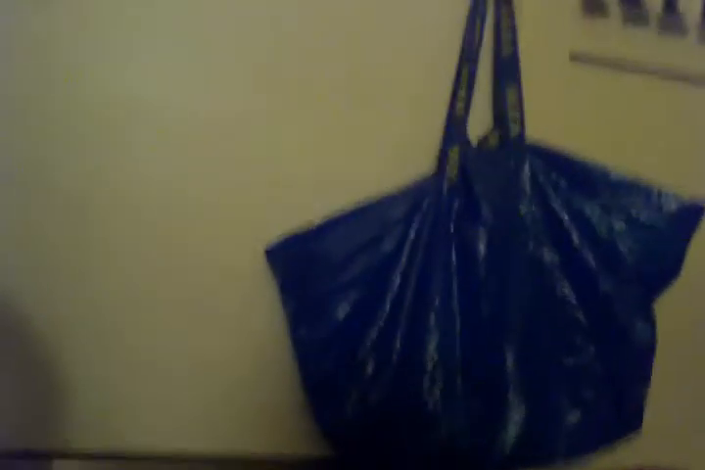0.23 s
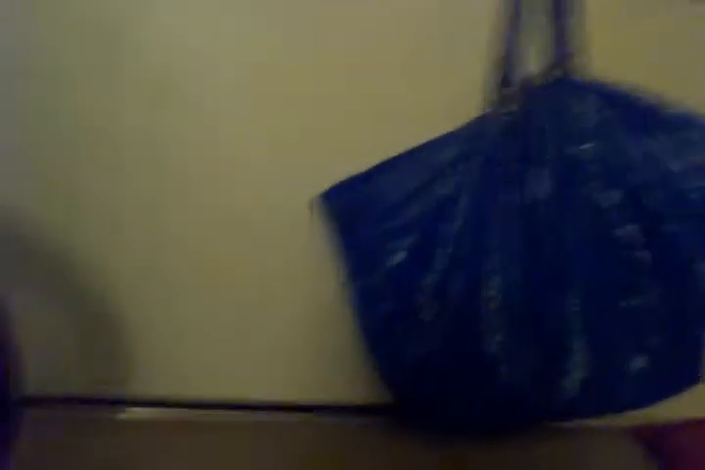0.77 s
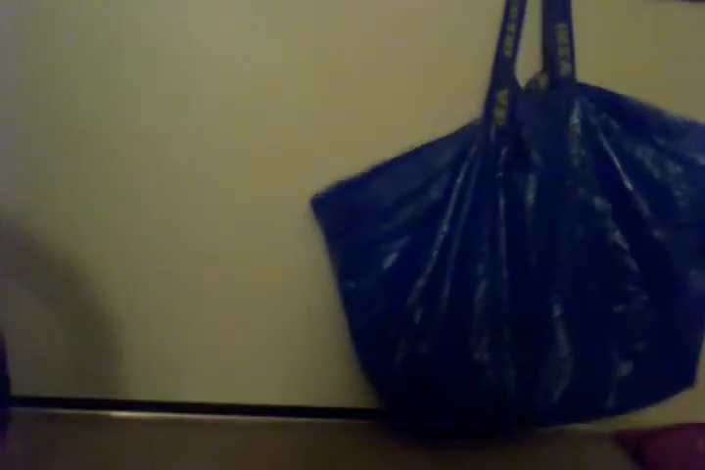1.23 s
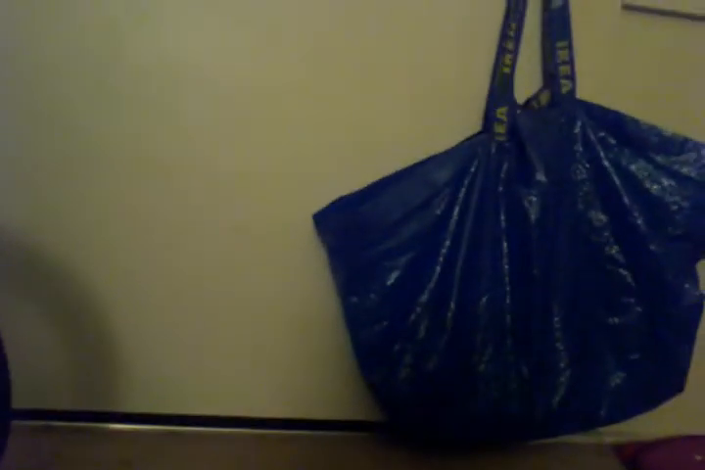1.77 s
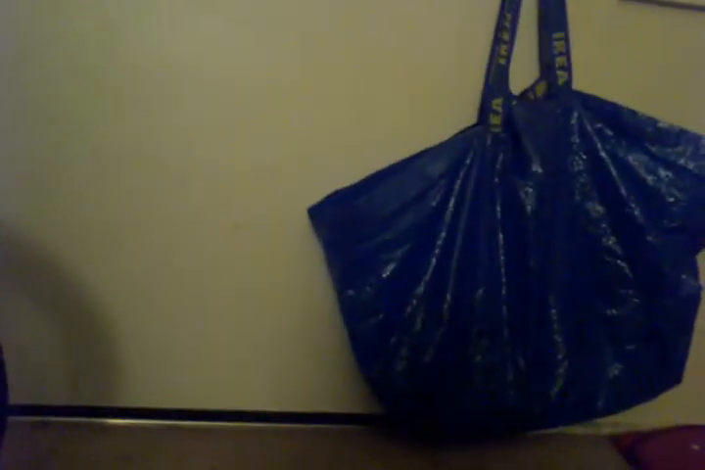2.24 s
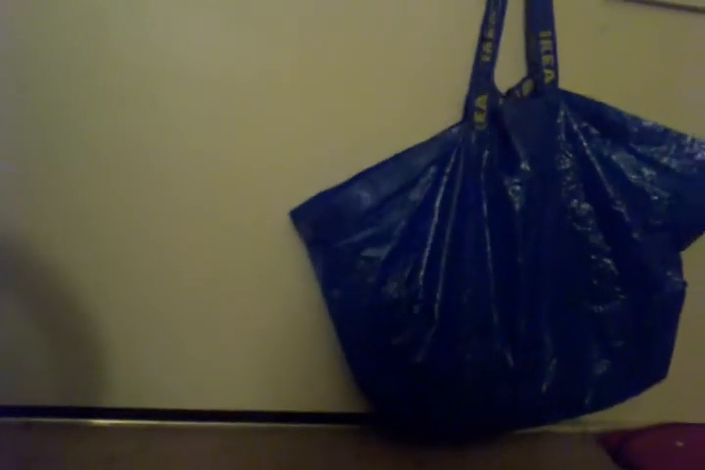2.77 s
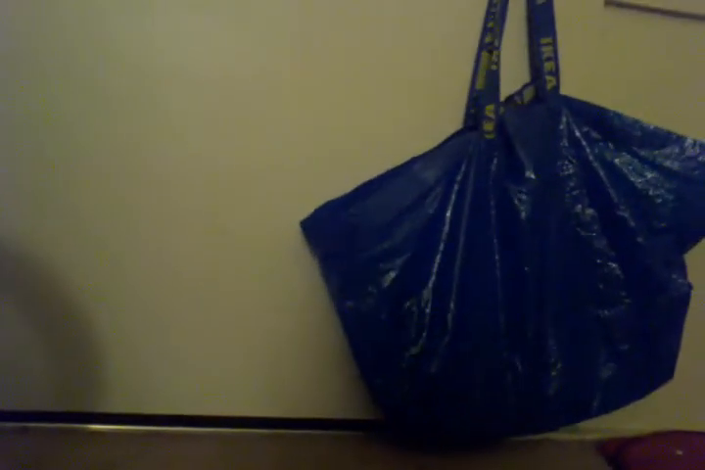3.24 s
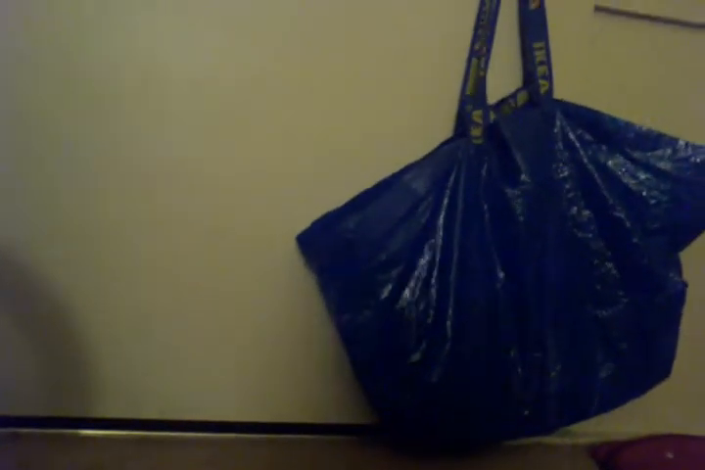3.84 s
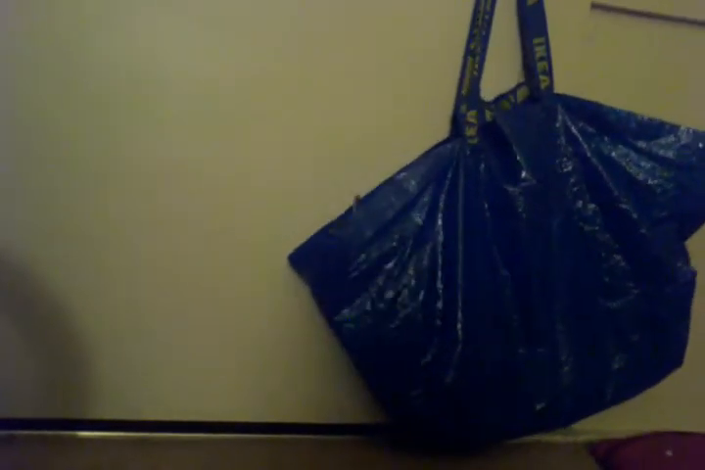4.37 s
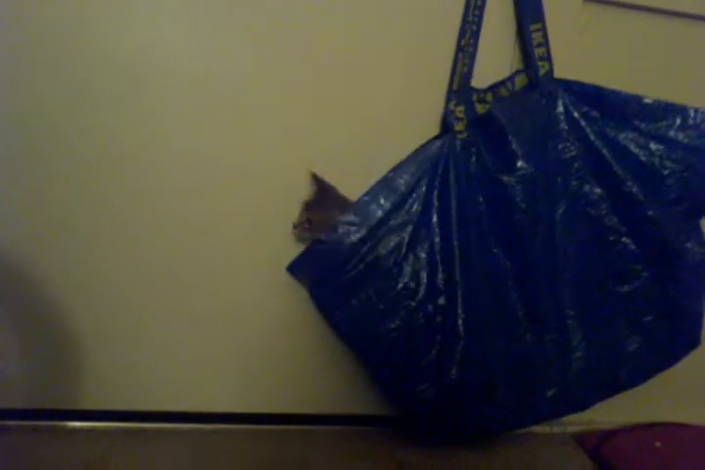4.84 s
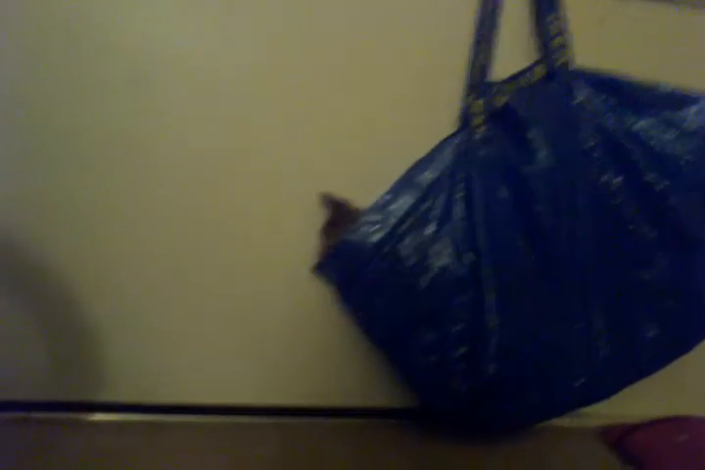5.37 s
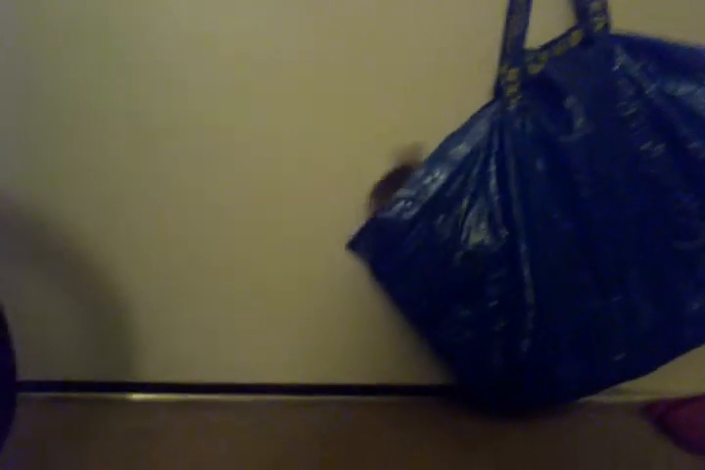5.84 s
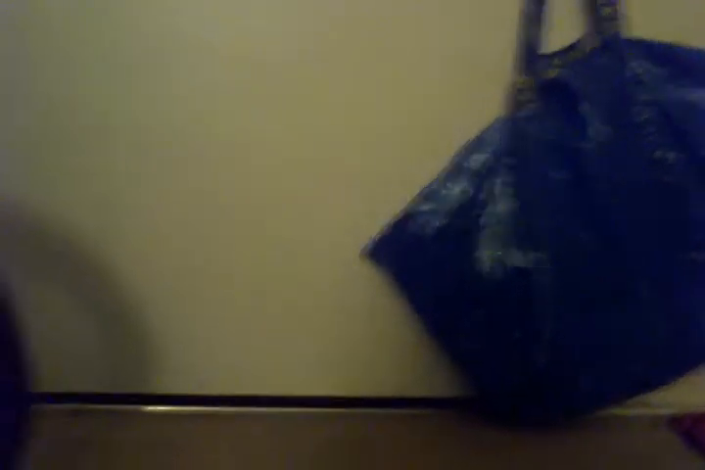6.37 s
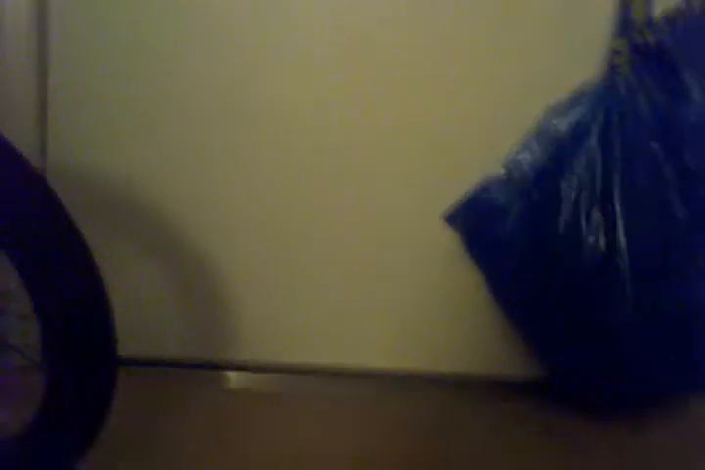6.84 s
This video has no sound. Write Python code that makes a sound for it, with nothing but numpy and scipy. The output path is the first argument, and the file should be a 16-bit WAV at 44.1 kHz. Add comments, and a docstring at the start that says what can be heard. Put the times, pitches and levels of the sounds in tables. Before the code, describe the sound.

A small indoor room, nearly silent, with a low murmur and faint hiss that creep up slightly; close stereo microphones. In the first 0.25 s there are faint scuffs and tiny ticks, then at about 0.37-0.48 s a thin, high kitten squeak gliding down, up and down. A single crisp click comes at 0.97 s. From 1.3 to 1.5 s a small cluster of dull plastic ticks sounds, then sparse clicks. At 2.4-2.6 s a soft bump and a brighter burst of snaps start steady scrabbling: crinkly woven plastic, dry pops, claw scratches and fur rubs, with a strong snap at 3.77 s and a dense patch near 4.35 s. It thins from 5 to 6 s, almost quiet by 5.9. From 6.1 s crackling returns, swishing near 6.6, with the loudest sharp snap at 6.72, a soft thud at 6.86 and dense loud rustling to the cut at 7.1 s.

```python
"""A big woven plastic shopping bag, hung just above the floor of a small room, is scrabbled in by a kitten.
Folds snap as clicks with decaying noise; crinkle, slides, claws and fur are filtered random grains.
Paws thud as low-pitched folds and soft decaying sines; one short high squeak near the start is a gliding tone.
Sources are a port sum and difference; two ports combine into a left and a right cardioid."""
import sys
import numpy as np
from scipy import signal
from scipy.fft import rfft, irfft, next_fast_len
from scipy.io import wavfile
from scipy.ndimage import map_coordinates

SR = 44100
rng = np.random.default_rng(int(sys.argv[2]) if len(sys.argv) > 2 else 0)


def unload_audio(sound):
    """Save the sound as a 16-bit wav file, at the path given as the first command line argument."""
    columns = np.transpose(np.atleast_2d(sound))
    # keep every value between -1 and 1, then stretch to whole-number steps
    steps = np.round(np.clip(columns, -1, 1) * 32767)
    wavfile.write(sys.argv[1], SR, steps.astype(np.int16))


N = 313618

# Levels are nominal: ahead of room, ports and any offset in the function.
# Room murmur and microphone hiss: pitch_hz, level_db
QUIET_SPECTRUM = [(20, 11.5), (50, -5.5), (100, 7.5), (200, 5), (400, -3.5), (1000, -13), (2000, -19.5),
                  (4000, -22.5), (8000, -21), (14000, -21)]
# Its loudness: time_s, level_db
QUIET_LEVEL = [(0, -79), (.3, -66), (.7, -65), (1.2, -63.5), (7.1, -57.5)]
# How hard the kitten works the sheet: time_s, effort_db
EFFORT = [(0.0, -76), (1.33, -74.5), (1.54, -69.5), (1.9, -72.5), (2.22, -68), (2.55, -60.5), (2.81, -64.5),
          (3.23, -56.5), (3.96, -62), (4.51, -57), (5.19, -65), (5.7, -71), (6.16, -62), (6.32, -59.5),
          (6.63, -57), (6.75, -46), (6.795, -52.5), (6.83, -48), (6.95, -48), (7.11, -42.5)]
# Sheet flexing: pitch_hz, level_db
FLEX_SPECTRUM = [(30, -46), (80, -12.5), (160, -4), (280, -3), (450, -6.5), (700, -9.5), (1400, -44.5)]
# Sheet crinkling: pitch_hz, level_db
CRINKLE_SPECTRUM = [(250, -19), (550, -2), (800, -1.5), (1100, 7), (1500, 0.5), (2000, 1.5), (2600, 0),
                    (3700, -3), (5500, -28.5)]
# Sheet sliding on itself: pitch_hz, level_db
SLIDE_SPECTRUM = [(1500, -10.5), (3000, -5.5), (4000, -2.5), (5300, -3.5), (6500, -0.5), (7800, 2),
                  (9500, 1), (11500, -3), (14000, -4)]
# Bag swings, sides slide over each other: loudest_s, level_db, half_length_s
SWING = [(6.6, -53, 0.11)]
# Faint scuff: time_s, centre_hz, level_db
SCUFF = [(.034, 1600, -99), (.044, 1506, -76), (.062, 1453, -82), (.073, 1094, -78), (.125, 1030, -81),
         (.15, 1040, -82)]
# Claws drag over the weave: loudest_s, level_db, half_length_s
SCRATCHES = [(0.053, -77, 0.0081), (.204, -66, 0.017), (1.42, -70, 0.081), (2.525, -63, 0.03),
             (3.145, -65, 0.1), (3.786, -55, 0.018), (6.44, -54, 0.025), (7.01, -45, 0.036)]
# Flank rubs along the sheet: loudest_s, level_db, half_length_s
RUBS = [(.205, -64.5, 0.017), (1.625, -65, 0.0092), (3.13, -65, 0.22), (4.01, -65, 0.066),
        (4.55, -64.5, 0.047), (4.68, -58.5, 0.08), (5.93, -69, 0.068), (6.99, -47, 0.019)]
# Claws on weave: pitch_hz, level_db
CLAW_SPECTRUM = [(1000, -23), (2000, -6), (4000, -1), (5500, -9), (7500, 4.5), (9500, 1), (11500, -7.5),
                 (14000, -8.5)]
# Fur on sheet: pitch_hz, level_db
FUR_SPECTRUM = [(500, -29.5), (1000, -7), (1500, -4.5), (2000, -4), (2500, -9), (3700, -13), (5500, -16)]
# Folds that snap under claws and paws: flip_s, peak_db, then relative to it thud_db, body_db, crack_db; ring_hz
SNAPS = [(0.128, -52, -29, -17, -12.5, 1220), (0.1686, -53.5, -17, -11.5, -13.5, 2100),
         (0.2423, -52, -24, -14, -14.5, 930), (0.9721, -26.5, -37, -23, -27.5, 1220),
         (0.986, -54, -25, -15, -34, 1700), (1.061, -55.5, -17.5, -30, -37.0, 540),
         (1.323, -53.5, -10.5, -13, -27, 800), (1.3782, -46.0, -22, -16, -25, 1380),
         (1.389, -43.5, -16, -21, -41, 800), (1.4075, -45, -24, -18, -34, 1100),
         (1.4198, -46, -28, -18.5, -24, 1600), (1.4427, -51, -28, -14, -34, 900),
         (1.454, -41.5, -21, -16.5, -25, 746), (1.464, -45, -24, -19, -28, 1700),
         (1.489, -41, -16.5, -18.5, -44, 740), (1.7233, -41.5, -22.5, -19.5, -47, 810),
         (1.736, -54, -32, -17, -40, 1400), (2.2385, -41.5, -22.5, -20, -25, 590),
         (2.3282, -46.5, -21, -22, -32, 900), (2.417, -38, -26.5, -18.5, -37, 710),
         (2.4595, -34, -26.5, -16.5, -19, 1260), (2.468, -39, -36, -20, -16, 1800),
         (2.4776, -30.5, -30, -19.5, -39, 740), (2.4855, -32.5, -21.5, -17, -25, 770),
         (2.506, -27.5, -42, -37, -18.5, 1060), (2.5077, -34, -36, -19.5, -38, 1060),
         (2.574, -37.5, -25, -22.5, -32, 1770), (2.5819, -27, -37, -21, -24, 1850),
         (2.629, -29.5, -41, -20, -35, 1090), (2.802, -32.5, -31.5, -19, -32, 2120),
         (2.833, -43, -21, -18, -41.5, 560), (2.848, -43, -19, -16, -20.5, 655),
         (2.874, -33.5, -24, -19, -36, 680), (2.8937, -38, -43.5, -21.5, -27, 1520),
         (2.982, -32, -22.5, -19.5, -27.5, 754), (3.069, -38.5, -41, -16.5, -26, 930),
         (3.182, -36, -53, -16.5, -23, 2240), (3.189, -30.5, -24, -16.5, -24, 2260),
         (3.32, -34.5, -32, -18.5, -39.0, 1280), (3.3733, -35.5, -24, -17.5, -36, 1100),
         (3.427, -31.5, -26.5, -16.5, -24, 1770), (3.4403, -33, -36, -29, -19.5, 480),
         (3.4902, -27, -38, -22.5, -52, 1800), (3.517, -38, -35, -19, -43, 613),
         (3.57, -39, -17, -18.5, -42, 770), (3.591, -33, -34, -20.5, -34, 1920),
         (3.6641, -36, -25.5, -18.5, -29, 1170), (3.671, -34, -38, -15.5, -24, 1210),
         (3.687, -27.5, -38, -16.5, -27.5, 1470), (3.772, -20.5, -33.5, -20.5, -31, 1240),
         (3.783, -40.5, -25, -13.5, -34, 940), (3.8939, -41, -40, -18, -22, 1190),
         (3.989, -43, -19.5, -17, -45, 540), (4.0932, -43, -32, -14, -42.5, 1290),
         (4.113, -41.5, -26, -17.5, -39, 560), (4.1821, -40.5, -30, -16, -44.5, 1460),
         (4.2224, -38, -21.5, -14, -23, 740), (4.2735, -40, -20.5, -19.5, -41, 700),
         (4.3183, -41, -29, -18, -34, 900), (4.3318, -26.5, -33, -20.5, -29, 684),
         (4.345, -37, -46, -17, -35, 1400), (4.3521, -32.5, -36, -19.5, -37.0, 1460),
         (4.358, -33, -31, -21.5, -17.5, 480), (4.396, -40, -44.5, -19, -34.0, 2150),
         (4.4142, -32, -24, -19.5, -20.5, 730), (4.46, -38.5, -30.5, -20, -41.0, 630),
         (4.478, -39.5, -24, -16, -45, 1140), (4.635, -30.5, -33, -20.5, -27, 650),
         (4.8226, -39, -19.5, -17.5, -27, 690), (4.857, -41, -38.0, -16.5, -23, 870),
         (4.8806, -45, -22, -17, -32, 700), (4.9588, -43, -16.5, -15, -13.5, 480),
         (4.9952, -37, -46, -29, -19, 1510), (5.004, -36.5, -27, -17.5, -15.5, 615),
         (5.1719, -42.5, -28.5, -18.5, -28, 2270), (5.2093, -48, -16.5, -22, -34, 795),
         (5.3159, -34.5, -28, -20.0, -29, 2070), (5.3727, -34, -22, -19.5, -30, 483),
         (5.3835, -46.5, -14, -12, -39.5, 480), (5.587, -36, -21.5, -18, -27.5, 2150),
         (6.118, -46, -22.5, -15.5, -16.5, 480), (6.1608, -42.5, -25, -18.5, -14, 2250),
         (6.183, -39.5, -20, -16, -20, 656), (6.206, -31.5, -36, -22.5, -26, 1640),
         (6.2156, -34.5, -29, -18, -17.5, 1170), (6.2193, -33.5, -45, -36, -16.5, 480),
         (6.244, -41, -37, -21, -20, 1500), (6.2485, -26, -34, -20, -24.5, 1630),
         (6.294, -28, -34, -20, -20.5, 1110), (6.3678, -28, -30, -19, -26, 990),
         (6.412, -39, -28, -20, -15, 497), (6.429, -26.5, -34, -20, -25.5, 2050),
         (6.577, -36.5, -35, -16.5, -15, 1580), (6.606, -32.5, -26, -18, -36, 480),
         (6.6247, -30.5, -29, -19, -18.5, 1580), (6.6545, -35, -22, -19.5, -22, 1300),
         (6.7215, -5.5, -53, -23, -32.5, 1520), (6.729, -23, -59, -20, -22.5, 1410),
         (6.807, -28, -27, -12.5, -30, 624), (6.857, -31, -24, -15.5, -34, 1160),
         (6.912, -34, -14, -25, -40, 480), (6.9711, -22.5, -26, -15, -30, 1900),
         (6.9747, -23, -23.5, -18.5, -22.5, 2030), (6.9943, -19.5, -48, -21.5, -39, 2080),
         (7.0087, -24, -33, -18, -25, 2000), (7.0252, -18, -36.5, -15.5, -24.5, 1160),
         (7.052, -15.5, -38, -38, -19, 1510), (7.0697, -10.5, -32, -20, -28, 970)]
# A paw pushes the sheet: pitch_hz, level_db
THUD_SPECTRUM = [(60, -11.5), (150, -16.5), (290, 3.5), (370, 3.5), (500, -7.5), (800, -4), (1600, -64.5)]
# The fold rings: pitch_hz, level_db
BODY_SPECTRUM = [(250, -26.5), (600, 4), (780, -4.5), (1000, 0), (1400, -3.5), (2000, -0.5), (2700, -8.5),
                 (3800, -12), (6000, -30)]
# Its sharp crease: pitch_hz, level_db
CRACK_SPECTRUM = [(1500, -71), (2800, 7), (3400, 7), (4100, 0), (5400, 1), (7500, 4), (10000, -2),
                  (14000, -7.5)]
# Squeak, one glide down, up and down: time_s, pitch_hz, level_db
SQUEAK = [(.369, 2890, -52), (.375, 2790, -34.5), (.381, 2420, -42.5), (.39, 2390, -43), (.405, 2565, -44),
          (.422, 2660, -42), (.436, 2680, -50), (.443, 2515, -47), (0.448, 2360, -55), (0.454, 2370, -34),
          (.46, 2300, -39), (.467, 2270, -56), (.477, 2270, -49)]
# Squeak catches in a brief rasp before each swell: loudest_s, level_db, half_length_s
CATCHES = [(0.372, -53.5, 0.003), (.4455, -59, 0.0048)]
# The rasp: pitch_hz, level_db
CATCH_SPECTRUM = [(900, -27), (1500, -6), (2100, -19), (2900, 7), (3400, -5), (4000, -22), (5000, -29),
                  (9000, -27)]
# Paws tread, small folds give way: busiest_s, level_db, half_length_s
FLURRIES = [(1.486, -60, 0.0092), (2.491, -54, 0.008), (3.205, -70, 0.016), (3.70, -64, 0.012),
            (3.795, -63, 0.0069), (4.35, -55.5, 0.018), (6.25, -53, 0.026), (6.995, -47, 0.021),
            (7.095, -47, 0.022)]
# Kitten's weight lands: start_s, level_db, pitch_hz
BUMPS = [(2.389, -46.5, 212), (6.863, -35.5, 200)]
# Room decay: pitch_hz, t60_s
ROOM_DECAY = [(150, 0.19), (1000, 0.49), (4000, 0.28), (14000, 0.058)]
# Port difference over port sum: pitch_hz, ratio_db
PORT_DIFFERENCE = [(60, -6.5), (250, -7), (600, -9), (1200, -5), (2000, -2.5), (3000, -1), (14000, 0)]
# Share of the other port in each cardioid: pitch_hz, share_ratio
CROSSFEED = [(100, 1), (3000, 1), (4400, 0.38), (6000, 0.28), (9000, 0.23), (14000, 0.17)]

BUSY_EFFORT_DB = -55
LEAD_S = .02  # room for the creak before a flip
RING_DB, RING_WIDTH_OCTAVES = 7.5, 0.28
SQUEAK_EDGE_S = .002
PORT_DELAY_S, TOP_HZ = 15 / 44100, 14000


def amp(db):
    """dB to amplitude ratio."""
    return 10 ** (np.asarray(db) / 20)


def unit(x):
    """x at rms 1."""
    return x / np.sqrt(np.mean(x ** 2) + 1e-20)


def along(points, hz):
    """Interpolate (Hz, value) points on a log frequency axis."""
    point_hz, values = np.transpose(points)
    return np.interp(np.log(hz + 1), np.log(point_hz), values)


def curves(rows):
    """One value per sample for each column after the time."""
    time_s, *columns = np.transpose(rows)
    return [np.interp(np.arange(N) / SR, time_s, column) for column in columns]


def swells(rows):
    """Summed bell-shaped gains of strokes that speed up and slow down again."""
    t = np.arange(N) / SR
    return sum(amp(db) * np.exp(-((t - s) / half_s) ** 2) for s, db, half_s in rows)


def wobble(knots_per_s):
    """Smooth random curve through normal knots."""
    knots = rng.standard_normal(int(N * knots_per_s / SR) + 4)
    return map_coordinates(knots, [np.arange(N) * knots_per_s / SR])


def filtered(x, response):
    """x times a complex response of frequency."""
    size = next_fast_len(N + SR // 2)
    spectrum = rfft(x, size) * response(np.fft.rfftfreq(size, 1 / SR))
    return irfft(spectrum, size)[..., :N]


def impulse(spectrum, size=1024):
    """Causal, minimum-phase click with this spectrum, by cepstrum folding."""
    level_db = along(spectrum, np.fft.rfftfreq(size, 1 / SR))
    cepstrum = irfft(np.log(amp(level_db)))
    cepstrum[1:size // 2] *= 2
    cepstrum[size // 2 + 1:] = 0
    return irfft(np.exp(rfft(cepstrum)))


def add(track, start_s, sound):
    """Mix a sound into the track."""
    part = track[:, round(start_s * SR):][:, :sound.shape[1]]
    part += sound[:, :part.shape[1]]


def crackle(spectrum, rate_hz, spread_db, smooth, clump_db):
    """Tiny buckles of limited, uneven size, in clumps, over smooth rubbing; sum and difference, joint rms 1."""
    sizes = amp(spread_db * np.minimum(rng.exponential(size=N), 2.5))
    hits = rng.random(N) < rate_hz / SR
    grains = unit(hits * sizes * rng.uniform(-0.98, 1, (2, N)))
    rubbing = smooth * rng.standard_normal((2, N))
    clumps = amp(clump_db * np.clip(wobble(40), -1.4, 1.4))
    drive = (grains + rubbing) * clumps
    return unit(signal.fftconvolve(drive, impulse(spectrum)[None], axes=1)[:, :N])


def room(x, tail_db, wall_db):
    """Near wall and floor answer within milliseconds, then the small room dies away."""
    noise = rng.standard_normal((2, SR // 3))
    hz, t, bins = signal.stft(noise, SR, nperseg=256)
    decay = amp(-60 * t / along(ROOM_DECAY, hz)[:, None]) * (t > .004)
    tail = signal.istft(bins * decay, SR, nperseg=256)[1]
    answer = amp(tail_db) * tail / np.linalg.norm(tail[0])
    for delay_s in rng.uniform(0.0027, .022, size=6):  # fresh paths on each call
        answer[:, round(delay_s * SR)] += amp(wall_db) * rng.choice([-1, 1], 2)
    return x + signal.fftconvolve(x, answer, axes=1)[:, :x.shape[1]]


def quiet():
    """Room murmur and microphone hiss: shaped noise whose level creeps up."""
    noise = filtered(rng.standard_normal((2, N)), lambda hz: amp(along(QUIET_SPECTRUM, hz)))
    return amp(curves(QUIET_LEVEL)[0]) * unit(noise)


def rustle():
    """One effort makes the sheet flex, crinkle, tick and slide, each with its own level and slope."""
    effort_db = curves(EFFORT)[0] - BUSY_EFFORT_DB

    def gain(busy_db, db_per_effort_db):
        return amp(busy_db + db_per_effort_db * effort_db)

    flex = crackle(FLEX_SPECTRUM, rate_hz=140, spread_db=6.0, smooth=0.84, clump_db=3.0)
    crinkle = crackle(CRINKLE_SPECTRUM, rate_hz=240, spread_db=3, smooth=.55, clump_db=4)
    ticks = crackle(BODY_SPECTRUM, rate_hz=45, spread_db=2, smooth=.1, clump_db=1)
    slide = crackle(SLIDE_SPECTRUM, rate_hz=700, spread_db=3, smooth=2, clump_db=.8)
    slide_gain = np.hypot(gain(-62.5, 0.85), swells(SWING))
    return gain(-58, 1) * flex + gain(-62.5, 1.025) * crinkle + gain(-68, 1.4) * ticks + slide_gain * slide


def scuff(knots_per_s=480):
    """Faint scuff: a narrow noise band whose centre sinks in pitch overall."""
    centre_hz, db = curves(SCUFF)
    phase = 2 * np.pi * np.cumsum(centre_hz) / SR

    def band():
        return wobble(knots_per_s) * np.cos(phase) + wobble(knots_per_s) * np.sin(phase)

    noise = unit(np.array([band(), band()]))
    return amp(db) * noise * (np.arange(N) / SR < SCUFF[-1][0])


def scratches():
    """Claws raise fine, bright grains; fur gives a softer, darker rub."""
    claws = crackle(CLAW_SPECTRUM, rate_hz=690, spread_db=1.5, smooth=0.77, clump_db=0.0)
    fur = crackle(FUR_SPECTRUM, rate_hz=500, spread_db=0.5, smooth=1.0, clump_db=1.5)
    return swells(SCRATCHES) * claws + swells(RUBS) * fur


def panel(ring_hz):
    """Ring of the sheet, lifted around the one pitch that a fold's panel size favours."""
    hz = np.geomspace(250, 6000, 48)
    lift_db = RING_DB * np.exp(-(np.log2(hz / ring_hz) / RING_WIDTH_OCTAVES) ** 2)
    return list(zip(hz, along(BODY_SPECTRUM, hz) + lift_db))


def buckle(spectrum, life_s, strain_s, chatter, scatter=0.11):
    """A fold creaks as strain builds, flips with a click, chatters to rest; sum and difference at energy 1."""
    flip = round(LEAD_S * SR)
    t = (np.arange(SR // 10) - flip) / SR
    envelope = amp(-60 * np.maximum(t / life_s, -t / strain_s))  # 60 dB per strain_s up, per life_s down
    drive = chatter * envelope * rng.standard_normal((2, len(t))) / np.sqrt(life_s * SR)
    drive[0, flip] += 1
    drive[1, flip + rng.integers(8)] += rng.choice([-1, 1])
    stiffness = np.exp(scatter * rng.standard_normal())  # every fold has its own size
    click = impulse([(hz * stiffness, db) for hz, db in spectrum])
    sound = signal.fftconvolve(drive, click[None], axes=1)
    return sound / np.linalg.norm(sound, axis=1, keepdims=True)


def snaps(sharp_life_s=0.019, sharp_strain_s=0.0088, sharp_ring_db=-19.5, brightening=0.3, hidden_db=9):
    """Sharp folds click short and dry; blunt ones, with more ring for their peak, give way slowly deeper in the bag."""
    out = np.zeros((2, N))

    def with_pause(x):  # space for the room tail
        return np.pad(x, ((0, 0), (0, SR // 5)))

    for flip_s, db, thud_db, body_db, crack_db, ring_hz in SNAPS:
        blunt = np.clip(amp(body_db - sharp_ring_db), .55, 2)
        life_s, strain_s = sharp_life_s * blunt ** 2, sharp_strain_s * blunt
        wet_db = hidden_db * min(np.log2(blunt), .3)
        # more crack over ring, as from a crease facing the microphone: brighter
        tilt_db_per_octave = brightening * np.clip(crack_db - body_db - 1, -12, 12)
        crease = [(hz, level_db + tilt_db_per_octave * np.log2(hz / 7000)) for hz, level_db in CRACK_SPECTRUM]
        thud = buckle(THUD_SPECTRUM, life_s + 0.051, strain_s, chatter=4.6, scatter=0.056)
        body = buckle(panel(ring_hz), life_s, strain_s, chatter=4.2 * blunt ** 2, scatter=0.017)
        crack = buckle(crease, .5 * life_s, strain_s, chatter=7 * blunt, scatter=0.076)
        # offsets turn peak dB into energy-1 gain
        low = amp(db + thud_db + 35.0) * thud + amp(db + body_db + 26.0) * body
        high = amp(db + crack_db + 26.5) * crack
        low = room(with_pause(low), tail_db=wet_db - 16.0, wall_db=wet_db - 18)
        high = room(with_pause(high), tail_db=wet_db - 10.5, wall_db=wet_db - 20)
        add(out, flip_s - LEAD_S, low + high)
    return out


def squeak(sum_db=-6, difference_db=-3, third_db=-31, turn_rad=0.11, rasp=0.049, jitter=0.0055, flicker_db=2.5):
    """Thin, nearly pure whistle that glides without a break and turns rough where it catches."""
    t = np.arange(N) / SR
    hz, db = curves(SQUEAK)
    rough = swells([(s, 0, half_s) for s, _, half_s in CATCHES])
    shaken_hz = hz * (1 + (jitter + rasp * rough) * wobble(900))
    phase = 2 * np.pi * np.cumsum(shaken_hz) / SR + np.array([[0], [turn_rad]])
    tone = np.sin(phase) + amp(third_db) * np.sin(3 * phase)
    edge_s = np.minimum(t - SQUEAK[0][0], SQUEAK[-1][0] - t)
    gate = np.clip(edge_s / SQUEAK_EDGE_S, 0, 1)
    level = gate * amp(db + flicker_db * wobble(260))
    whistle = amp([[sum_db], [difference_db]]) * level * tone
    rasping = crackle(CATCH_SPECTRUM, rate_hz=900, spread_db=2, smooth=1, clump_db=1)
    return whistle + swells(CATCHES) * rasping


def flurries(thud_db=-2, body_db=-1, crack_db=-13):
    """Small folds give way at random under a treading paw, with the thud, ring and crack colours of the big ones."""
    parts = [(THUD_SPECTRUM, thud_db), (BODY_SPECTRUM, body_db), (CRACK_SPECTRUM, crack_db)]
    folds = np.zeros((2, N))
    for spectrum, db in parts:
        folds += amp(db) * crackle(spectrum, rate_hz=160, spread_db=3.5, smooth=0.12, clump_db=-1.0)
    return swells(FLURRIES) * folds


def bumps(rise_s=0.0042):
    """The kitten's weight lands softly in the bag's bottom: a sine that swells, then decays."""
    out, t = np.zeros((2, N)), np.arange(SR // 8) / SR
    envelope = t / rise_s * np.exp(1 - t / rise_s)
    for start_s, db, hz in BUMPS:
        bump = amp(db) * envelope * np.sin(2 * np.pi * hz * t)
        add(out, start_s, bump * np.ones((2, 1)))
    return out


def scene():
    """Pressure at the two ports: long waves reach both nearly alike."""
    sheet = rustle() + scuff() + scratches() + flurries() + bumps()
    bag = snaps() + room(sheet, tail_db=-10.0, wall_db=-16.5)
    whistle = room(squeak(), tail_db=-21.5, wall_db=-28)
    common, difference = bag + whistle + quiet()
    difference = filtered(difference, lambda hz: amp(along(PORT_DIFFERENCE, hz)))
    return np.array([common + difference, common - difference])


def record(dry, right_db=0.26):
    """Own port minus the delayed other port makes each cardioid; then equalise and limit the band."""
    def share(hz):
        return np.clip(along(CROSSFEED, hz), 0, 1)

    other = filtered(dry[::-1], lambda hz: share(hz) * np.exp(-2j * np.pi * hz * PORT_DELAY_S))
    cardioids = (dry - other) * amp([[-right_db], [right_db]])  # left down, right up
    return filtered(cardioids, lambda hz: (hz < TOP_HZ) / np.hypot(1, share(hz)))


dry = scene()
out = record(dry)
unload_audio(out)
```